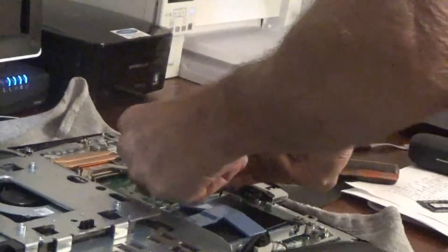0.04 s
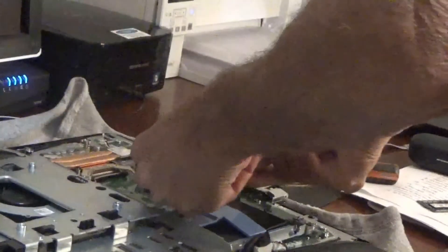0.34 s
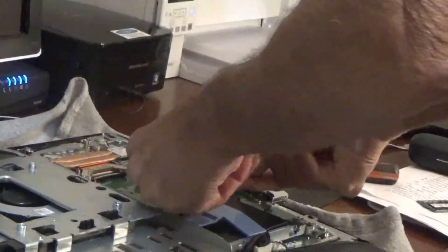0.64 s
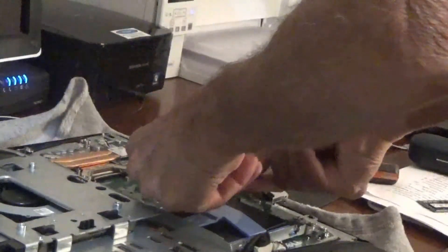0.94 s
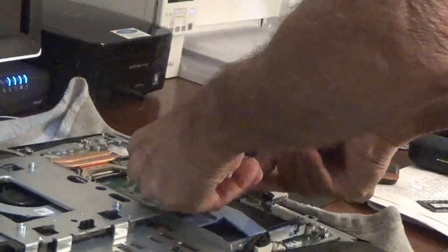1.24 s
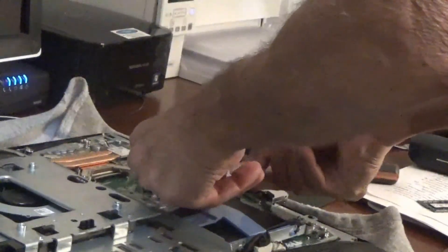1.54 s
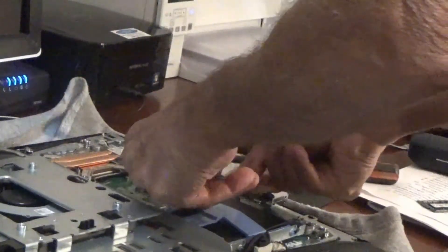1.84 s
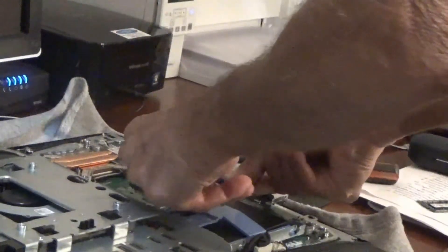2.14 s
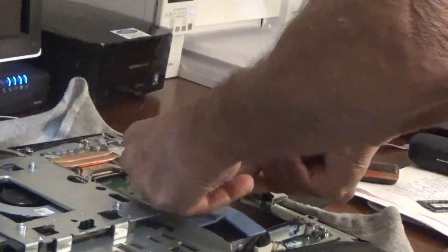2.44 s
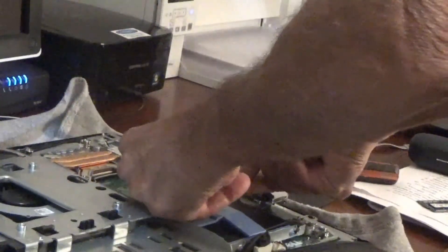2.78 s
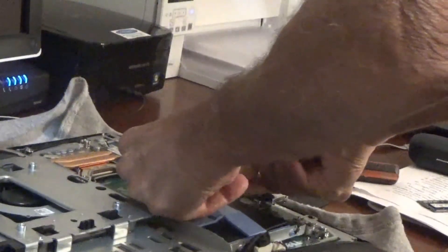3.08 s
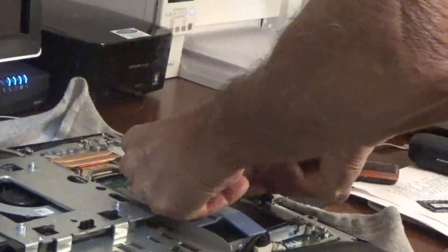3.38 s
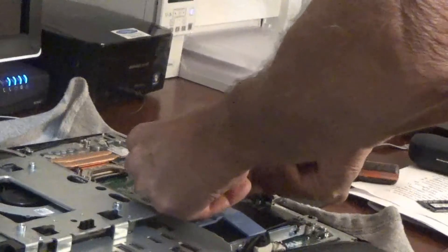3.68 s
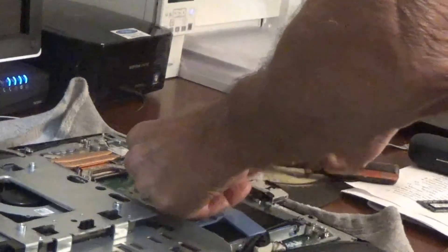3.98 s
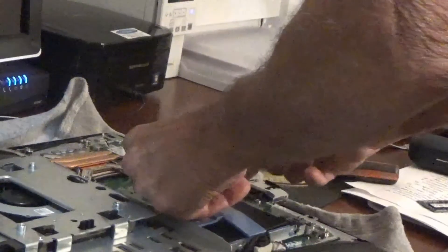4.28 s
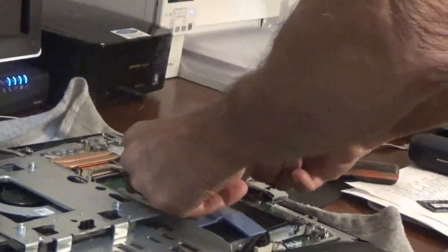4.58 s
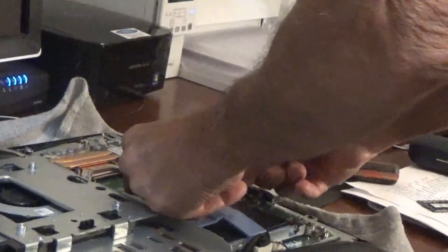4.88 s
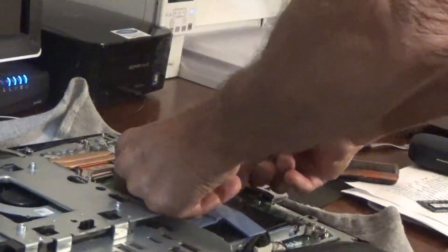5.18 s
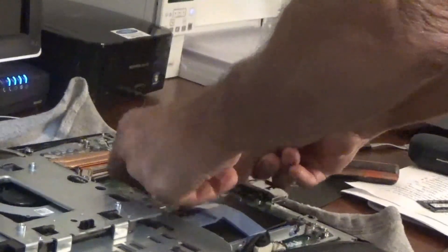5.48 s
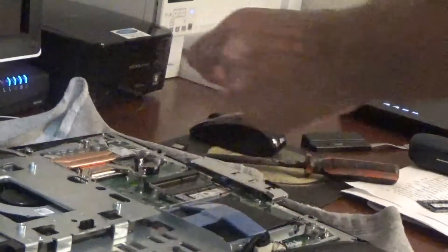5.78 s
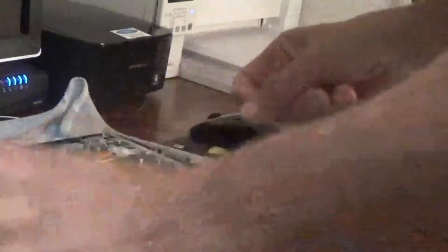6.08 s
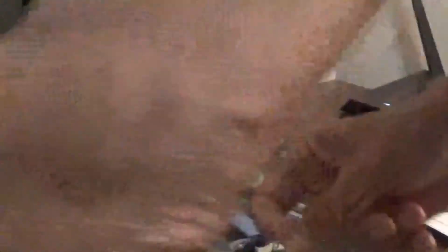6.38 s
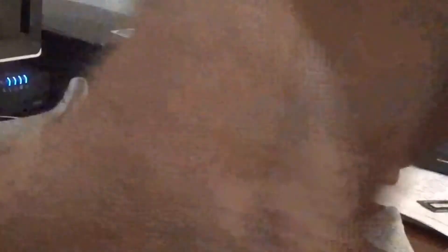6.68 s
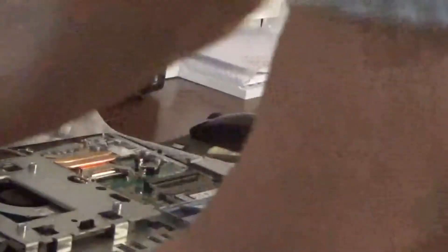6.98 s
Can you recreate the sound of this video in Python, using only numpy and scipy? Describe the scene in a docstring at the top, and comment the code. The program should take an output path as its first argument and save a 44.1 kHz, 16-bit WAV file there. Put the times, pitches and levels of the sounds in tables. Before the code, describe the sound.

Small clicks and scrapes of a circuit board pressed into its socket, with a sharp snap and a desk bump.

```python
"""A plastic clack comes first, as hands press a memory module into an opened laptop on a desk. Ticks,
scrapes and squeaks follow, a spring latch clicks, and the module snaps loudly into its socket. Then a
hand bumps the desk and an arm brushes past. Impacts excite damped modes (the harder the contact, the
brighter the sound), while sliding friction gives swells of noise. A small, fairly dry room answers;
a faint hum and hiss lie underneath."""
import sys
import numpy as np
from scipy import signal
from scipy.fft import rfft, irfft, next_fast_len
from scipy.io import wavfile

SR = 44100
rng = np.random.default_rng(int(sys.argv[2]) if len(sys.argv) > 2 else 0)


def store_pcm(level_fs):
    """Save levels as 16-bit WAV."""
    pcm = np.round(np.clip(level_fs, -1, 1) * 32767).astype(np.int16)
    wavfile.write(sys.argv[1], SR, np.atleast_2d(pcm).T)


N = 314433
T = np.arange(SR // 2) / SR  # time axis of one blow or stroke [s]

# Reverberation of the room: (frequency [Hz], t60 [s])
ROOM_DECAY = [(150, 0.22), (500, 0.29), (1500, 0.31), (4000, 0.26), (10000, 0.22)]
# Likeness of left and right: (frequency [Hz], correlation [1])
AIR_COHERENCE = [(60, 0.98), (140, 0.96), (340, 0.52), (830, 0.023), (1980, 0.17), (4740, 0.54),
                 (11400, 0.81)]
ROOM_COHERENCE = [(200, 0.97), (700, 0.88), (2000, .74), (6000, 0.66), (10000, 0.89)]

# Noise spectra of the air and the parts: (frequency [Hz], relative spectral density [dB])
AIR_SPECTRUM = [(12, -32), (20, -3), (75, -12.5), (111, -3), (179, -9), (328, -10.5), (572, -12.5),
                (688, -11), (1300, -14.5), (1400, -16), (1640, -12.5), (1830, -15.5), (2140, -16),
                (2440, -17.5), (11000, -25.5), (14300, -123), (22000, -120)]
CLOTH_SPECTRUM = [(300, -25), (1500, -11), (2850, -4), (3170, 2), (3550, -4.5), (5700, -7), (6450, 0.5),
                  (7200, -9), (9800, 0.5), (11000, -3), (14000, -42)]
BOARD_SPECTRUM = [(50, -46), (150, -7), (500, -5.5), (1000, -1.5), (1900, 3), (3000, -2.5), (6000, -11.5),
                  (11000, -13)]
DESK_SPECTRUM = [(60, -30), (180, 0), (290, -4), (400, 0), (620, -6), (800, -19), (1400, -26), (2100, -21),
                 (4000, -33), (11000, -52)]
CHASSIS_SPECTRUM = [(100, -38), (330, 3), (650, -11), (1050, 9), (1600, -0.5), (2600, 0), (3400, -3.5),
                    (5500, -7), (11000, -5)]
LATCH_SPECTRUM = [(100, -24), (350, -20), (650, -19), (1050, 1), (2000, -3.5), (2800, 5), (3300, -5.5),
                  (4500, -1), (6700, -5), (11000, -7.5)]
SOCKET_SPECTRUM = [(100, -41), (400, -28), (800, 0), (1400, -0.5), (2300, 5), (3200, -2.5), (4200, 1),
                   (6300, -3.5), (7600, 1), (11000, -2.5)]
# Normal modes of the parts: (frequency [Hz], relative level [dB], t60 before cap and damping [s])
BOARD_RESONANCES = [(1054, -2.5, 0.074), (1412, 4, 0.075), (1808, 4, 0.044), (2114, -2, 0.079),
                    (2620, -13, 0.046), (3654, -2, .04), (4920, -5.5, 0.022), (9600, -11, 0.024)]
DESK_RESONANCES = [(122, -12, .16), (166, 1, .17), (201, 4, .18), (234, -3, .17), (294, -9, .13),
                   (371, 1, .22), (454, -7, .14), (506, -2, .17), (565, -3, .11), (684, -14, .15)]
CHASSIS_RESONANCES = [(641, -5, 0.15), (1070, -1.5, 0.14), (1435, 4, 0.12), (1790, 0, 0.15),
                      (2090, -23, 0.8), (2094, -7, 0.22), (2430, -17, 0.21), (2650, -4, 0.099),
                      (2720, 2.5, 0.077), (3030, -28.5, 0.3), (3300, -11, 0.27), (4350, -16, 0.37),
                      (4944, 1, 0.098), (5660, -4, 0.16)]
LATCH_RESONANCES = [(1055, -3, .22), (1782, -3, .15), (2003, -2, .15), (2750, -2, .1), (2842, -3, .17),
                    (3580, -3, .14), (3838, -6, .18), (4585, 2, .11), (5281, -7, .15), (10850, -1, .08)]
SOCKET_RESONANCES = [(1514, -4, .2), (1755, -2, .25), (2194, 1, .22), (2277, 0, .2), (2352, 0, .22),
                     (2751, -1, .2), (3731, -3, .16), (4791, -2, .15), (5022, -3, .2), (5346, -4, .2),
                     (5728, -4, .16), (7215, -1, .18), (7332, -1, .16), (7747, -2, .18), (7848, 0, .18),
                     (7985, -1, .18), (8410, -2, .18), (8725, -2, .18), (10111, -1, .18), (10280, -2, .17),
                     (10607, -1, .17)]

# Sliding contacts: (peak time [s], rise [s], level [dB])
ARM_SWISHES = [(5.8, 0.35, -69.5), (6.35, 0.45, -70.5), (6.96, 0.14, -62), (7.015, 0.042, -52.5)]  # a bare arm over cloth
HAND_RUBS = [(2.02, 0.23, -62.5), (5.85, 0.11, -60.5), (6.96, 0.25, -62)]  # the heel of a hand on the chassis
# Contacts sticking in the slot: (peak time [s], rise [s], level [dB], pitch [Hz])
SLOT_SQUEAKS = [(.257, 0.016, -55, 6000), (2.079, .033, -61, 6030), (2.205, 0.012, -58, 5980),
                (5.449, 0.017, -58.5, 4800), (5.451, 0.017, -58.5, 5430)]
# The board's edge in the slot: (peak time [s], rise [s], level [dB], hardness [dB/octave])
EDGE_SCRAPES = [(.275, .035, -60, 0), (2.425, 0.051, -53.5, -5), (2.64, 0.15, -69, -12),
                (3.075, 0.047, -65, -6), (3.468, 0.051, -50.5, -0.5), (3.81, 0.06, -64, 4.5),
                (5.111, 0.011, -42, 2), (5.128, 0.011, -37, -1), (5.435, 0.044, -59, -1)]
# Blows to the desk, from a hand or through the laptop: (time [s], gain [dB], cut-off [Hz])
DESK_BUMPS = [(1.991, -56.5, 1200), (4.456, -50, 1200), (5.122, -59, 1490), (5.859, -53.5, 393),
              (5.886, -49.5, 250), (6.039, -25.5, 3020), (6.0637, -24, 241), (6.097, -40, 1500),
              (6.665, -49, 586), (6.687, -53.5, 297)]
# Impacts: (time [s], level [dB], hardness [dB/octave])
BOARD_TICKS = [(.247, -49, 4), (.258, -50, -1), (.274, -48, 2), (.287, -50, 1), (1.665, -52, 6.5),
               (1.793, -49, 0.5), (1.985, -47.5, 2.5), (2.199, -53.5, 0), (2.265, -55, 2.5),
               (2.414, -50.5, 2), (2.432, -53, 9), (2.504, -54, 5), (2.541, -50.5, 0.5), (2.639, -55, -6),
               (3.031, -47.5, 1.5), (3.784, -53.5, 0.5), (4.409, -52, -1), (4.811, -51.5, 0.5),
               (5.032, -53.5, 4.5), (5.377, -55.5, 7)]  # the board touching plastic
CHASSIS_CLACKS = [(.0005, -22.5, 2), (.006, -27.5, 1.5), (.015, -32, -2)]  # plastic against the chassis
LATCH_CLICKS = [(3.4645, -38.5, -4), (3.471, -51, -1.5), (4.451, -34, -0.5), (4.4546, -24.5, 3.5),
                (4.4618, -32, 2.5)]  # the latch nudged, then slipping, striking and bouncing
SOCKET_SNAPS = [(5.1112, -30, -6), (5.1136, -26, 8), (5.1265, -29, -4.5), (5.1379, -20, 2.5),
                (5.1417, -20.5, 5), (5.147, -28.5, 3.5)]  # the module seating


def amp(db):
    """Amplitude grows tenfold for every 20 dB."""
    return 10 ** (np.asarray(db) / 20)


def unit(x):
    """Power normalisation: scales to rms 1."""
    return x / np.sqrt(np.mean(x ** 2) + 1e-20)


def burst(x):
    """Energy normalisation: scales to the energy of 5 ms at rms 1."""
    return unit(x) * np.sqrt(.005 * SR / x.shape[-1])


def along(points, hz):
    """Interpolation of (frequency [Hz], value) points on a logarithmic axis."""
    frequencies, values = np.transpose(points)
    return np.interp(np.log(hz + 1), np.log(frequencies + 1), values)


def filtered(x, response):
    """Linear filtering multiplies the spectrum by a frequency response."""
    size = x.shape[-1]
    padded = next_fast_len(size + 8192)
    return irfft(rfft(x, padded) * response(np.fft.rfftfreq(padded, 1 / SR)), padded)[..., :size]


def noise(spectrum, size):
    """Spectral shaping turns white noise into coloured noise of rms 1."""
    return unit(filtered(rng.standard_normal(size), lambda hz: amp(along(spectrum, hz))))


def narrowband(centre_hz, half_width_hz, size):
    """A resonance driven by noise gives a wavering tone."""
    return filtered(rng.standard_normal(size), lambda hz: 1 / (1 + ((hz - centre_hz) / half_width_hz) ** 2))


def spread(pair, coherence):
    """Partial coherence: two independent signals mix as mid and side into left and right."""
    angle = lambda hz: np.arccos(np.clip(along(coherence, hz), -1, 1)) / 2
    mid, side = filtered(pair, lambda hz: np.array([np.cos(angle(hz)), np.sin(angle(hz))]))
    return np.array([mid + side, mid - side])


def background(air_db, hum_hz, hum_half_width_hz, hum_db):
    """Stationary noise: broadband room air and a narrowband low hum."""
    pair = np.array([noise(AIR_SPECTRUM, N), noise(AIR_SPECTRUM, N)])
    air = unit(spread(pair, AIR_COHERENCE))
    hum = unit(narrowband(hum_hz, hum_half_width_hz, N))
    return amp(air_db) * air + amp(hum_db) * hum


def in_room(x, wet_db):
    """Reverberation: the direct sound gains a diffuse tail, each frequency decaying at its own rate."""
    hz, t, bands = signal.stft(rng.standard_normal((2, len(T))), SR, nperseg=256)
    decay = amp(-60 * t / along(ROOM_DECAY, hz)[:, None])
    tail = signal.istft(bands * decay, SR, nperseg=256)[1][:, :len(T)]
    onset = 1 - np.exp(-(T / 0.00076) ** 2)
    tail = spread(tail * onset, ROOM_COHERENCE)
    reverb = signal.fftconvolve(np.atleast_2d(x), tail / np.linalg.norm(tail[0]), axes=1)
    return x + amp(wet_db) * reverb[:, :len(T)]


def add(track, time_s, sound):
    """Superposition: a sound adds to the track from the given time."""
    start = max(round(time_s * SR), 0)
    track[:, start:start + sound.shape[-1]] += sound[:, :N - start]


def hardened(x, hardness):
    """Hard contact favours treble, soft contact bass; small parts radiate deep bass poorly."""
    radiated = lambda hz: hz ** 2 / (hz ** 2 + 110 ** 2) / (1 + (hz / 12000) ** 24)
    return filtered(x, lambda hz: amp(hardness * np.log2(1 + hz / 250)) * radiated(hz))


def strokes(rows, source, wet_db, fall_over_rise=0.54):
    """Friction sound follows the push: a Gaussian swell with a faster release."""
    track = np.zeros((2, N))
    t = T - T[-1] / 2
    for peak_s, rise_s, db, *contact in rows:
        width_s = np.where(t < 0, rise_s, fall_over_rise * rise_s)
        push = np.exp(-2 * (t / width_s) ** 2)
        add(track, peak_s + t[0], in_room(amp(db) * unit(source(*contact)) * push, wet_db))
    return track


def swishes(wet_db):
    """Sliding friction: cloth fibres hiss under the arm."""
    return strokes(ARM_SWISHES, lambda: noise(CLOTH_SPECTRUM, len(T)), wet_db)


def squeaks(half_width_hz, wet_db):
    """Stick-slip friction: a contact sings briefly in one narrow resonance."""
    return strokes(SLOT_SQUEAKS, lambda hz: narrowband(hz, half_width_hz, len(T)), wet_db)


def scrapes(slips_per_s, skin_hardness, wet_db):
    """Random micro-slips excite the board: mostly brighter under its own edge, dull under skin."""
    def grit(hardness):
        slips = rng.standard_normal(len(T)) * (rng.random(len(T)) < slips_per_s / SR)
        return hardened(filtered(slips, lambda hz: amp(along(BOARD_SPECTRUM, hz))), hardness)
    return strokes(EDGE_SCRAPES, grit, wet_db) + strokes(HAND_RUBS, lambda: grit(skin_hardness), wet_db)


def fidgets(count, span_s, db, hardness):
    """Random impacts: rows of faint touches as the fingers feel for the slot."""
    return [(time_s, db, hardness) for time_s in rng.uniform(*span_s, count)]


def ring(modes, damping, scatter_db):
    """Free vibration in damped modes; the fingers' grip shifts their strength and pitch at each blow."""
    hz, db, t60 = np.transpose(modes)[:, :, None]
    hz = hz * (1 + .004 * rng.standard_normal(hz.shape))
    strength = amp(db + scatter_db * rng.standard_normal(hz.shape)) * rng.choice([-1, 1], hz.shape)
    decay = amp(-60 * T * damping / np.minimum(t60, .4))
    return np.sum(strength * decay * np.sin(2 * np.pi * hz * T), axis=0)


def desk(slap_s, slap_top_hz, thud_t60, thud_db, ring_db, lowest_hz, wet_db):
    """Panel radiation: a blow gives one steep push of air, then the desk top booms in its low modes."""
    track = np.zeros((2, N))
    pulse = -(1 - T / slap_s) * np.exp(-T / slap_s)
    slap = signal.lfilter(*signal.butter(3, slap_top_hz, fs=SR), pulse)
    for time_s, db, cutoff_hz in DESK_BUMPS:
        slap_db = 16.52 + 15 * np.log2(cutoff_hz / 3010)  # soft blows hardly slap the air
        thud = burst(noise(DESK_SPECTRUM, len(T)) * amp(-60 * T / thud_t60))
        boom = burst(ring(DESK_RESONANCES, damping=1.6, scatter_db=-2))
        body = amp(thud_db) * thud + amp(ring_db) * boom
        body = signal.lfilter(*signal.butter(2, cutoff_hz, fs=SR), body)
        add(track, time_s, in_room(amp(db) * (amp(slap_db) * slap + body), wet_db))
    return signal.lfilter(*signal.butter(3, lowest_hz, "high", fs=SR), track)  # radiates no deep bass


def impacts(rows, spectrum, modes, crack_t60, rattle_t60, rattle_db, ring_db, damping, wet_db):
    """Impulse excitation: a crack, a dense chassis rattle and the part's ring, all tilted by hardness."""
    track = np.zeros((2, N))
    build_up = 1 - np.exp(-T / 0.0014)  # the blow takes a moment to cross the chassis
    for time_s, db, hardness in rows:
        crack = burst(noise(spectrum, len(T)) * amp(-60 * T / crack_t60))
        diffuse = spread(noise(spectrum, (2, len(T))), ROOM_COHERENCE)
        rattle = burst(diffuse * amp(-60 * T / rattle_t60)) * build_up
        ringing = burst(ring(modes, damping, scatter_db=4.0))
        blow = crack + amp(rattle_db) * rattle + amp(ring_db) * ringing
        add(track, time_s, in_room(amp(db) * burst(hardened(blow, hardness)), wet_db))
    return track


def scene():
    """Superposition of the nearby handling sounds and the room's background."""
    clack = impacts(CHASSIS_CLACKS, CHASSIS_SPECTRUM, CHASSIS_RESONANCES, crack_t60=0.015,
                    rattle_t60=0.071, rattle_db=-0.5, ring_db=-4.5, damping=2.0, wet_db=-4.5)
    latch = impacts(LATCH_CLICKS, LATCH_SPECTRUM, LATCH_RESONANCES, crack_t60=0.015,
                    rattle_t60=0.043, rattle_db=-2.0, ring_db=2.5, damping=3.8, wet_db=-5.5)
    snaps = impacts(SOCKET_SNAPS, SOCKET_SPECTRUM, SOCKET_RESONANCES, crack_t60=0.018,
                    rattle_t60=0.19, rattle_db=-4, ring_db=-9, damping=1.8, wet_db=-3.0)
    touches = BOARD_TICKS + fidgets(count=6, span_s=(2, 3), db=-56.5, hardness=-1.8)
    ticks = impacts(touches, BOARD_SPECTRUM, BOARD_RESONANCES, crack_t60=0.019,
                    rattle_t60=0.025, rattle_db=8.5, ring_db=5, damping=1.0, wet_db=0.5)
    friction = scrapes(slips_per_s=2500, skin_hardness=-11, wet_db=-3)
    friction += squeaks(half_width_hz=87, wet_db=-6)
    friction += swishes(wet_db=0.5)
    bumps = desk(slap_s=0.00045, slap_top_hz=6160, thud_t60=0.083, thud_db=2.5, ring_db=2.0,
                 lowest_hz=129, wet_db=-6)
    ambience = background(air_db=-58, hum_hz=116.4, hum_half_width_hz=8.5, hum_db=-71.5)
    return ambience + friction + ticks + bumps + clack + latch + snaps


def record(dry, top_hz=11080):
    """Band limiting: a steep low-pass removes the highest treble."""
    return filtered(dry, lambda hz: 1 / np.sqrt(1 + (hz / top_hz) ** 160))


dry = scene()
out = record(dry)
store_pcm(out)
```